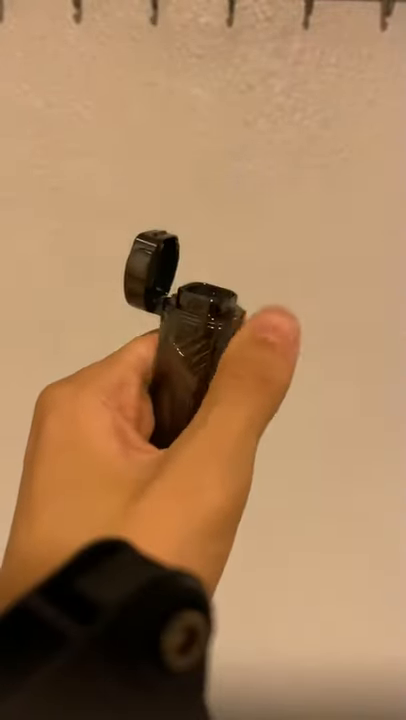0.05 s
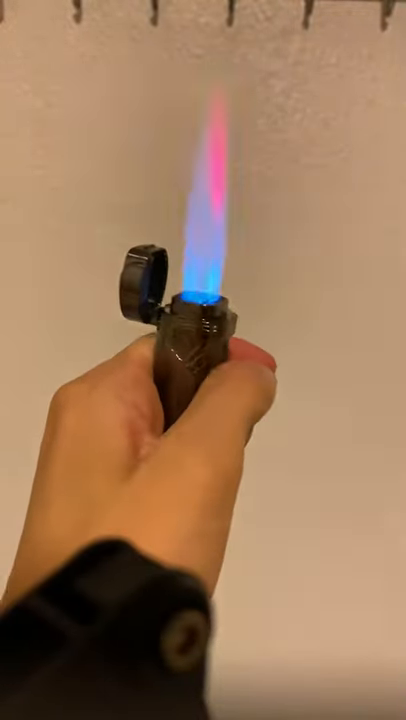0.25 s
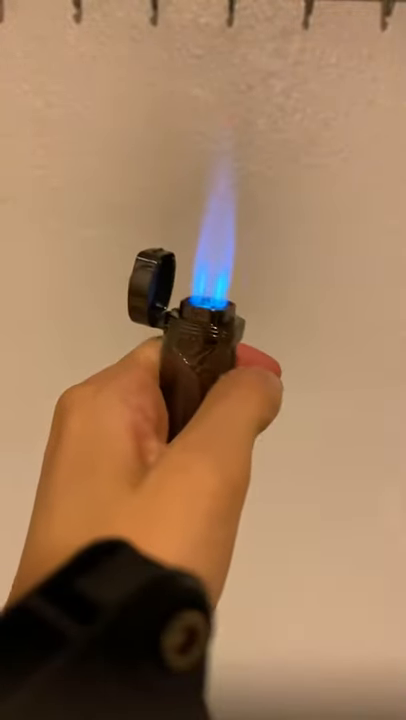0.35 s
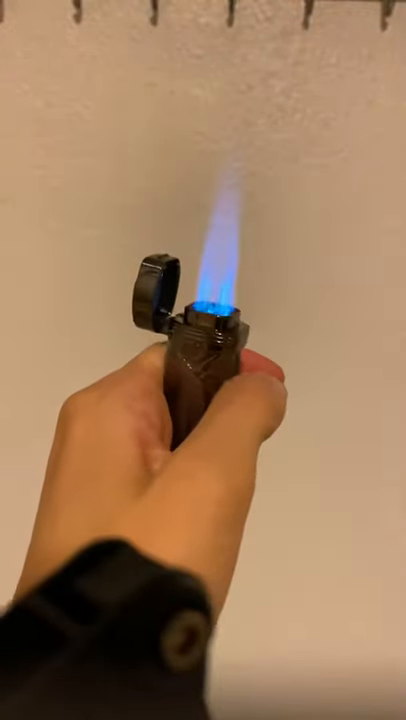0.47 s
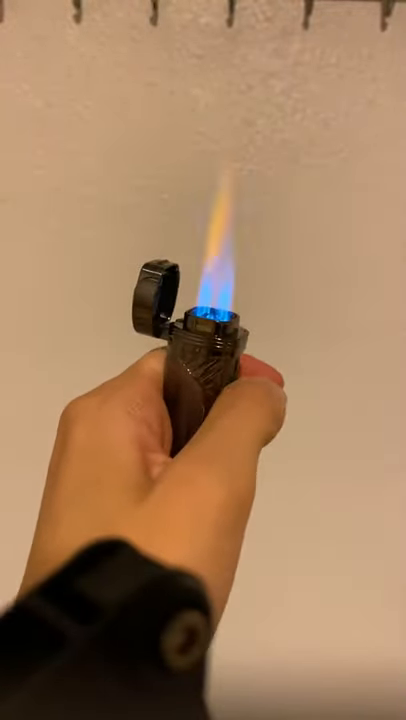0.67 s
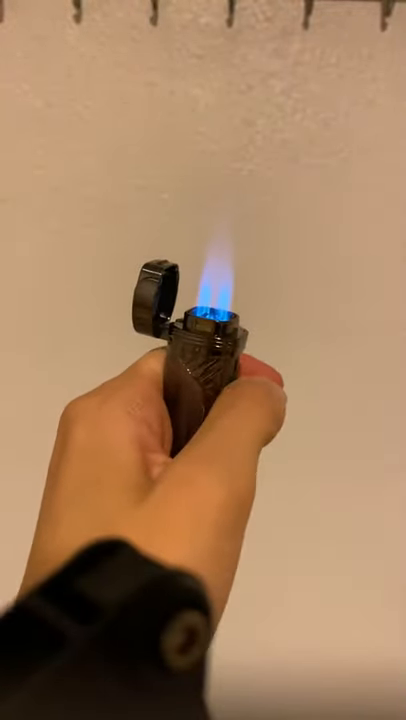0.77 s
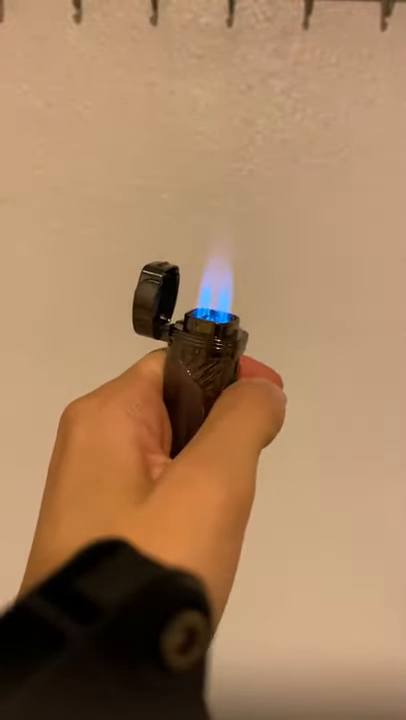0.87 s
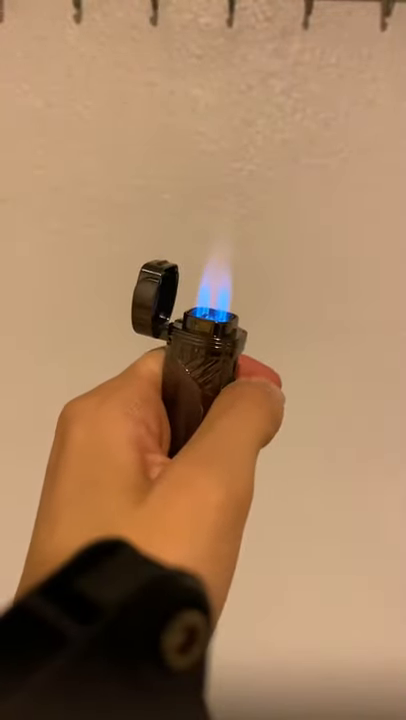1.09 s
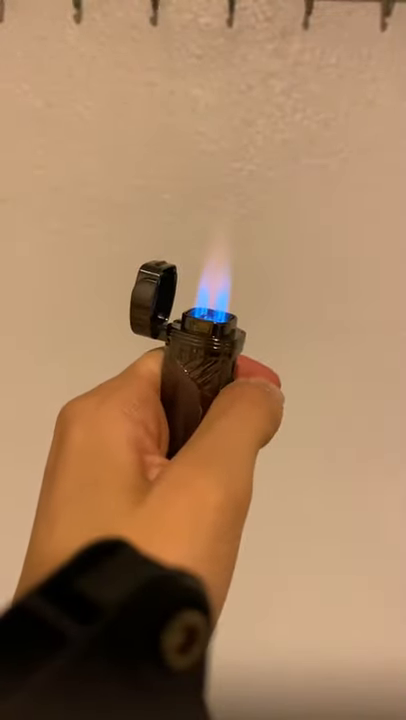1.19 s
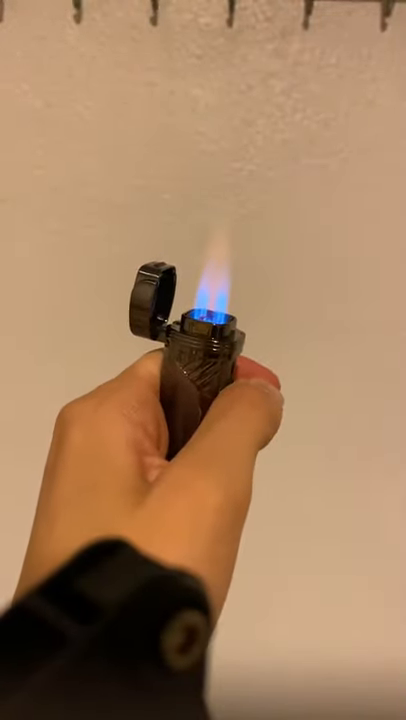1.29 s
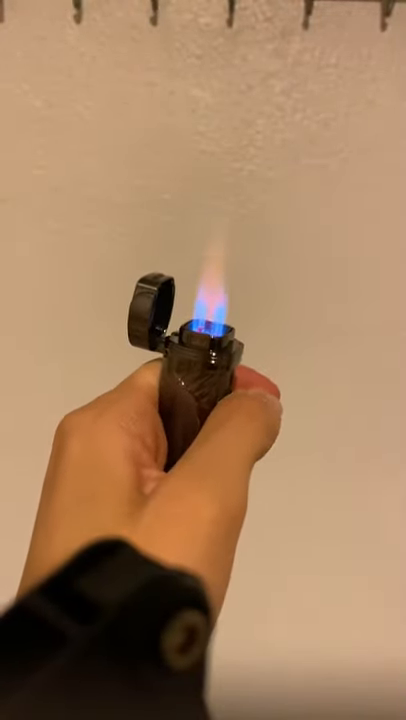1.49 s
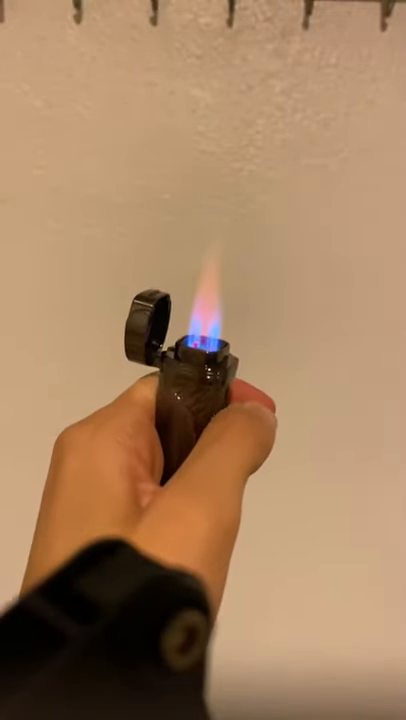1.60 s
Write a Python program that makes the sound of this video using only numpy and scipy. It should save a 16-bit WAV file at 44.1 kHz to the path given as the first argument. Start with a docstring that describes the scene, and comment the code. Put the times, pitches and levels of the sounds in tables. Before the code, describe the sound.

A gas torch lighter snaps sharply, ignites with a soft thump, and burns with airy roar

```python
"""A metal gas lighter, close up in a small quiet room: decaying modes and noise for its contacts.
The thumb slides, the trigger creeps, and the igniter snaps with a spark and rings the case.
The gas catches with a falling note, a hollow pop and a soft thump, all swelling sines.
Wavering noise makes the flame, which settles into a brighter roar over the nozzle's steady hiss."""
import sys
import numpy as np
from scipy import signal
from scipy.fft import rfft, irfft
from scipy.io import wavfile

SR = 44100
rng = np.random.default_rng(int(sys.argv[2]) if len(sys.argv) > 2 else 0)


def master_out(mix):
    """Clip the mix to full scale and print it as 16-bit PCM to the path in sys.argv[1]."""
    frames = np.transpose(np.atleast_2d(mix))
    ceiling = np.clip(frames, -1, 1)
    pcm = np.round(ceiling * 32767).astype(np.int16)
    wavfile.write(sys.argv[1], SR, pcm)


N = 72765
T = np.arange(N) / SR  # seconds
HZ = np.maximum(np.fft.rfftfreq(2 * N, 1 / SR), 1)  # bins of a doubled length, clear of zero for the log

# Quiet background of the room. Each row: frequency in Hz, relative density in dB per Hz.
FLOOR_SPECTRUM = [(20, 2), (45, 5), (120, 3), (200, -7), (440, -5), (650, -14), (1100, -50), (2000, -55),
                  (6000, -50.5), (16000, -39)]
# Thumb sliding onto the trigger. Each row: frequency in Hz, relative density in dB per Hz.
THUMB_SPECTRUM = [(1000, -52), (2000, -23), (2900, -4.5), (4500, -9.5), (5200, -2.5), (5650, 0), (6200, -3),
                  (7500, -13.5), (10000, -12), (15000, -25)]
# Contacts of trigger and igniter, softer ones mostly duller.
# Each row: start in seconds, relative level in dB, treble edge in Hz.
CONTACTS = [(0.1173, -42, 5500), (0.147, -38.5, 9000), (0.2071, -31, 4500), (0.2158, 1, 17000),
            (0.2314, -19.5, 16000), (0.858, -40.5, 3960)]
# Modes of the metal case. Each row: frequency in Hz, relative level in dB, 60 dB decay in seconds.
CASE_MODES = [(1803, -28, 0.058), (2110, -37.5, 0.1), (2398, -28.5, 0.13), (2465, -29.5, 0.083),
              (2670, -34.5, .12), (2964, -31.5, 0.072), (3157, -31.5, 0.058), (3690, -28, 0.038),
              (3883, -27.5, .07), (4320, -24, .07), (5310, -29.5, 0.028), (6190, -28.5, 0.09),
              (10340, -24, .025), (10840, -26, 0.026), (15200, -30, .02)]
# Dry crack of a contact. Each row: frequency in Hz, relative density in dB per Hz.
CRACK_SPECTRUM = [(150, -52.5), (700, -24), (1200, -19), (1750, 1), (2000, -13), (2400, 5.5), (3100, 1.5),
                  (3350, 2), (3800, 2.5), (4300, -3), (4650, -14.5), (5250, 3.5), (6200, -7), (7500, -9),
                  (10400, -7), (12500, -13.5), (15300, -5), (16000, -11.5)]
# The room's answer to a contact. Each row: frequency in Hz, relative density in dB per Hz.
ROOM_SPECTRUM = [(150, -38.5), (400, -21.5), (1100, -14.5), (1750, -3.5), (2050, -8.5), (2450, 4),
                 (3100, -2), (3400, -3), (4000, 4), (4650, -3.5), (5200, -4), (6500, -2), (8500, -7),
                 (10500, -7), (11800, -24.5), (14000, -18), (15500, -25)]
# Gas at the nozzle. Each row: frequency in Hz, relative density in dB per Hz.
HISS_SPECTRUM = [(1000, -1), (3000, 2.5), (5500, 0.5), (7200, -7.5), (9000, 9), (10500, 4.5), (12500, 5.5),
                 (13800, 5), (15500, 0)]
# Low roar of the flame over time. Each row: time in seconds, level in dB.
ROAR_LEVEL_CURVE = [(0.215, -71), (0.25, -51.5), (0.36, -51), (0.48, -50), (0.52, -56.5), (0.7, -56),
                    (0.85, -52.5), (1.1, -54.5), (1.35, -54.5), (1.65, -56.5)]
# Upper rush of the flame over time. Each row: time in seconds, level in dB.
RUSH_LEVEL_CURVE = [(0.215, -75), (0.33, -63), (0.42, -61.5), (0.48, -56.5), (0.51, -62), (0.62, -63),
                    (0.78, -57), (1.0, -53.5), (1.3, -52), (1.65, -50)]
# Colour of the low roar. Each row: frequency in Hz, relative density in dB per Hz.
ROAR_SPECTRUM = [(20, -16), (42, 6), (65, 2.5), (120, 2.5), (200, -12.5), (300, -2.5), (420, 4), (600, -3),
                 (900, -9.5), (1300, -20), (3000, -45.5)]
# Colour of the upper rush. Each row: frequency in Hz, relative density in dB per Hz.
RUSH_SPECTRUM = [(300, -22), (600, -5), (870, 1.5), (1120, -4.5), (1380, -1), (1800, -6.5), (2350, -7),
                 (3000, -15.5), (4300, -21), (5300, -21.5), (7000, -50.5), (16000, -27.5)]
# Puffs of the flame, the first is the ignition.
# Each row: start in seconds, thump level in dB, pop level in dB.
FLAME_PUFFS = [(0.225, -30, -44), (0.277, -48, -40.5), (0.856, -44.5, -36.5), (1.354, -45.5, -56)]
# Phase between the microphone ports. Each row: frequency in Hz, lead of the left in radians.
PORT_LEAD = [(20, 0), (1000, -.2), (2800, .5), (4200, 1.3), (4800, 6.0), (5600, 6.6), (6400, 8.9),
             (7300, 9.4), (8200, 9.9), (9300, 11.9), (11300, 13.0), (12300, 14.9), (14300, 16.0),
             (15600, 18.7)]
# Likeness of the two sides in noise. Each row: frequency in Hz, correlation with 1 for identical.
SIDE_LIKENESS = [(60, .998), (130, .98), (220, .88), (700, .87), (1350, .97), (1800, .97), (2500, .84),
                 (4300, .65), (5200, .88), (7200, .97), (10000, .94), (13500, .93), (15500, .7)]

FLOOR_DB = -61
THUMB_DB, THUMB_T60_S = -57, 0.21
CRACK_DB, CRACK_T60_S = -11.5, 0.0095
RATTLE_DB, RATTLE_T60_S = -28.5, 0.036
ROOM_DB, ROOM_T60_S, ROOM_BUILD_S = -30, 0.21, 0.0016
HISS_DB, VALVE_OPENS_S, VALVE_S = -68, 0.175, 0.024
SURGE_DB, SURGE_S = 10, 0.11
# At ignition the burning pocket grows and its note falls.
IGNITION_S, WHOOP_DB, WHOOP_RISE_S = 0.216, -43, 0.0067
WHOOP_START_HZ, WHOOP_FALL_S = 1420, 0.00802
# The spark jumps just after the hammer lands.
SPARK_S, SPARK_DB, SPARK_WIDTH_S = 0.2166, -3, 0.00002
POP_HZ, POP_RISE_S = 410, 0.0027
THUMP_HZ, THUMP_RISE_S, THUMP_LAG_S = 91.6, 0.0065, 0.0033
THIN_BELOW_HZ = 1370  # contacts and spark are thin below this
CUTOFF_HZ = 16000


def from_db(db):
    """Turn decibels into gain."""
    return 10 ** (np.asarray(db) / 20)


def at_hz(points):
    """Read a table along a log-frequency axis."""
    hz, value = np.transpose(points)
    return np.interp(np.log(HZ), np.log(hz), value)


def level(points):
    """Draw a gain over time from a curve in dB."""
    return from_db(np.interp(T, *np.transpose(points)))


def dying(t60):
    """Decay exponentially from time zero, by 60 dB in t60 seconds."""
    return from_db(-60 * T / t60)


def noise(spectrum):
    """Colour stereo noise to rms 1, its sides as alike at each frequency as the table says."""
    mid, side = rfft(rng.standard_normal((2, 2 * N)))
    alike = np.clip(at_hz(SIDE_LIKENESS), -1, 1)
    shared = np.sqrt(1 + alike) * mid
    opposed = np.sqrt(1 - alike) * side * [[1], [-1]]
    x = irfft(from_db(at_hz(spectrum)) * (shared + opposed))[:, :N]
    return x / x.std()


def flutter(rate_hz, depth_db):
    """Waver the gain at random, with slow noise of depth_db rms."""
    slow = rfft(rng.standard_normal(2 * N)) / (1 + (HZ / rate_hz) ** 2)
    x = irfft(slow)[:N]
    return from_db(depth_db * x / x.std())


def room_floor():
    """The quiet room: steady coloured noise."""
    return from_db(FLOOR_DB) * noise(FLOOR_SPECTRUM)


def thumb_slide():
    """Skin rubs onto the trigger: coloured noise that dies away from the start."""
    return from_db(THUMB_DB) * dying(THUMB_T60_S) * noise(THUMB_SPECTRUM)


def case_ring():
    """The struck case rings in decaying modes of alternating sign."""
    ring = np.zeros(N)
    for k, (hz, db, t60) in enumerate(CASE_MODES):
        ring += (-1) ** k * from_db(db) * dying(t60) * np.sin(2 * np.pi * hz * T)
    return ring


def igniter():
    """Every contact gives a crack, a brief rattle, the ring of the case and a room tail."""
    ring = case_ring()
    crack = from_db(CRACK_DB) * dying(CRACK_T60_S)
    rattle = from_db(RATTLE_DB) * dying(RATTLE_T60_S)
    tail = from_db(ROOM_DB) * dying(ROOM_T60_S) * (1 - np.exp(-T / ROOM_BUILD_S))
    out = np.zeros((2, N))
    for start_s, db, edge_hz in CONTACTS:
        start = int(start_s * SR)
        blow = ring + (crack + rattle) * noise(CRACK_SPECTRUM) + tail * noise(ROOM_SPECTRUM)
        soften = signal.butter(2, edge_hz, fs=SR, output="sos")
        blow = signal.sosfilt(soften, blow + 1e-18)  # inaudible offset
        out[:, start:] += from_db(db) * blow[:, :N - start]
    return out


def nozzle():
    """Gas hisses once the valve opens, harder at first and then steady."""
    age = np.maximum(T - VALVE_OPENS_S, 0)
    opening = np.minimum(age / VALVE_S, 1)
    pressure = from_db(HISS_DB + SURGE_DB * np.exp(-age / SURGE_S))
    return noise(HISS_SPECTRUM) * opening * pressure


def flame():
    """Turbulent burning: a low roar and, above it, a rush that flutters faster and deeper."""
    roar = level(ROAR_LEVEL_CURVE) * noise(ROAR_SPECTRUM) * flutter(rate_hz=13, depth_db=0.3)
    rush = level(RUSH_LEVEL_CURVE) * noise(RUSH_SPECTRUM) * flutter(rate_hz=28, depth_db=1.08)
    return roar + rush


def whoop():
    """The flame front spreads from the spark: a quick falling note that leads into the thump."""
    age = np.maximum(T - IGNITION_S, 0)
    # summed cycles of a pitch that falls exponentially
    cycles = WHOOP_START_HZ * WHOOP_FALL_S * (1 - np.exp(-age / WHOOP_FALL_S))
    envelope = age / WHOOP_RISE_S * np.exp(1 - age / WHOOP_RISE_S)
    return from_db(WHOOP_DB) * envelope * np.sin(2 * np.pi * cycles)


def spark():
    """One sharp push and pull of air."""
    x = (T - SPARK_S) / SPARK_WIDTH_S
    return from_db(SPARK_DB) * x * np.exp((1 - x ** 2) / 2)


def lighter():
    """Contacts and spark, thin in the bass."""
    thin = signal.butter(4, THIN_BELOW_HZ, "high", fs=SR, output="sos")
    return signal.sosfilt(thin, igniter() + spark() + 1e-18)


def swell(start_s, hz, rise_s):
    """A few cycles of pressure that swell and die away."""
    age = np.maximum(T - start_s, 0)
    envelope = (age / rise_s * np.exp(1 - age / rise_s)) ** 2
    return envelope * np.sin(2 * np.pi * hz * age)


def puffs():
    """A pocket of gas flares: a hollow pop, then a low thump of opposite sign."""
    out = np.zeros(N)
    for start_s, thump_db, pop_db in FLAME_PUFFS:
        out -= from_db(pop_db) * swell(start_s, POP_HZ, POP_RISE_S)
        out += from_db(thump_db) * swell(start_s + THUMP_LAG_S, THUMP_HZ, THUMP_RISE_S)
    return out


def scene():
    """Lighter, thumb, gas and flame over the quiet room."""
    handling = thumb_slide() + lighter()
    burning = nozzle() + flame() + whoop() + puffs()
    return room_floor() + handling + burning


def record(dry):
    """Shift the right port's phase against the left, then cut the top of both."""
    lag = np.interp(HZ, *np.transpose(PORT_LEAD))
    right = irfft(rfft(dry[1], 2 * N) * np.exp(-1j * lag))[:N]
    pair = np.array([dry[0], right])
    top_cut = signal.ellip(10, 0.2, 80, CUTOFF_HZ, fs=SR, output="sos")
    return signal.sosfilt(top_cut, pair)


dry = scene()
out = record(dry)
master_out(out)
```